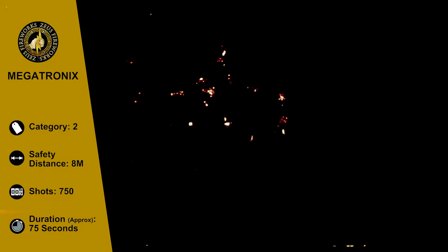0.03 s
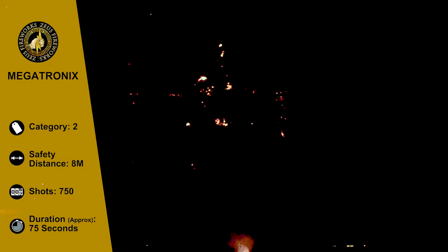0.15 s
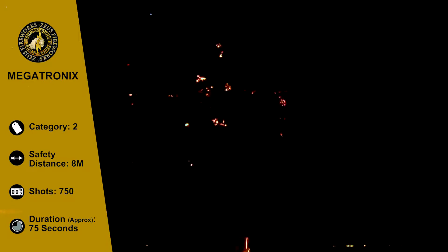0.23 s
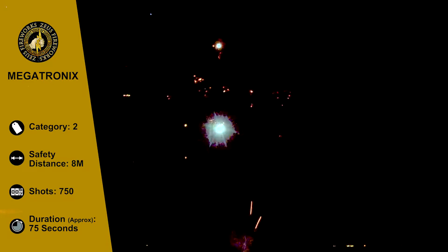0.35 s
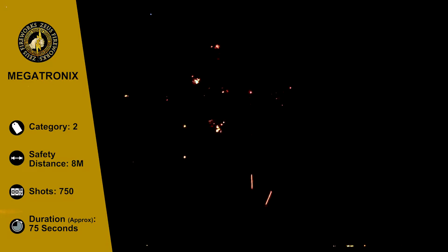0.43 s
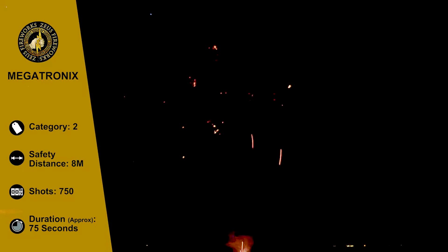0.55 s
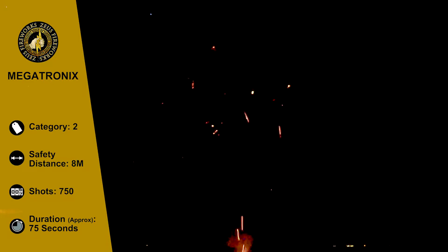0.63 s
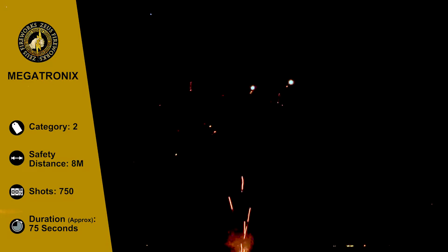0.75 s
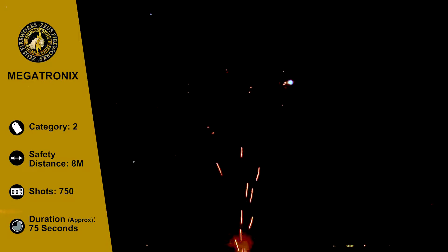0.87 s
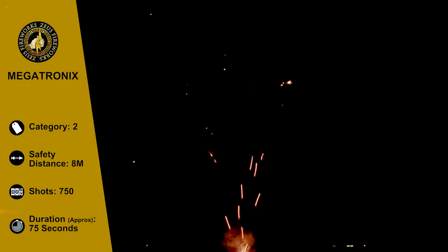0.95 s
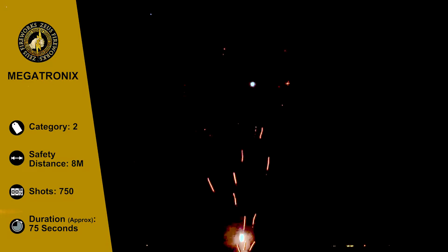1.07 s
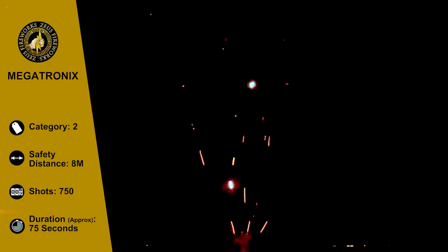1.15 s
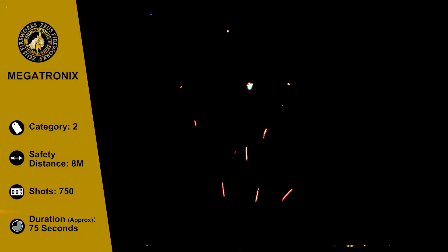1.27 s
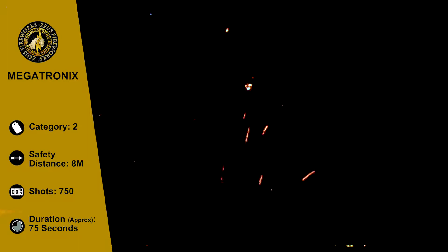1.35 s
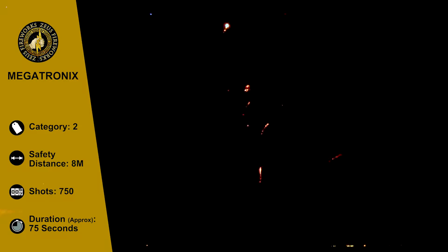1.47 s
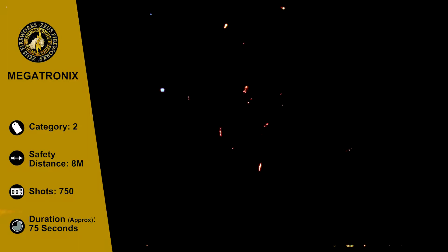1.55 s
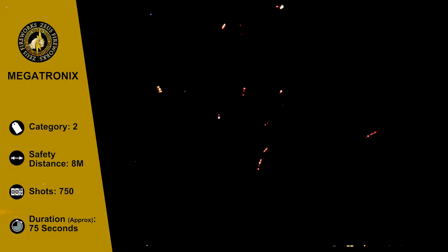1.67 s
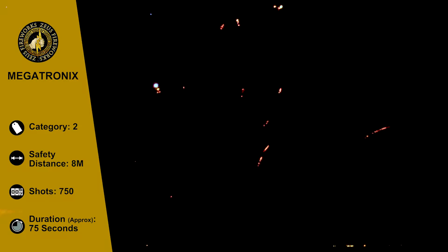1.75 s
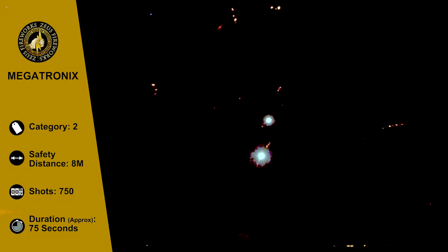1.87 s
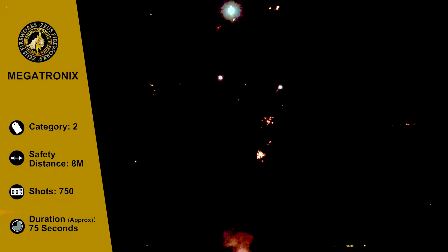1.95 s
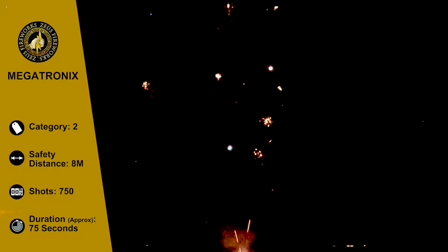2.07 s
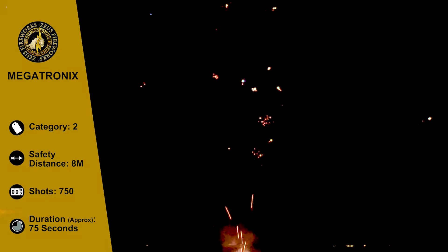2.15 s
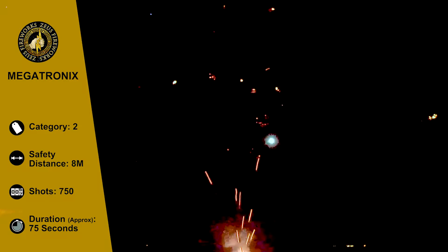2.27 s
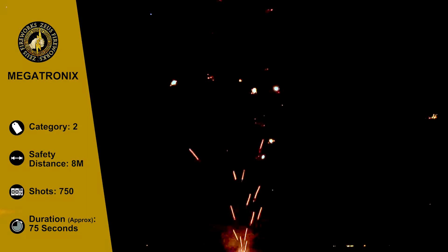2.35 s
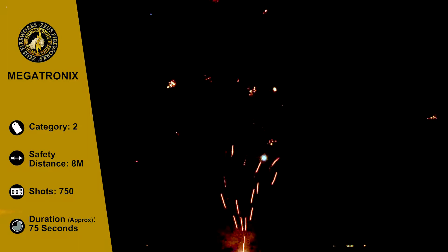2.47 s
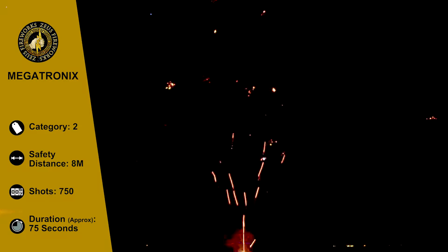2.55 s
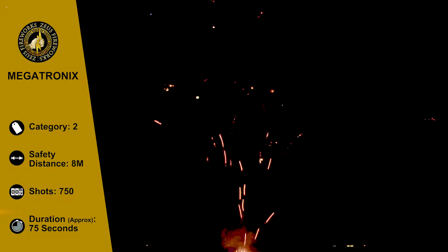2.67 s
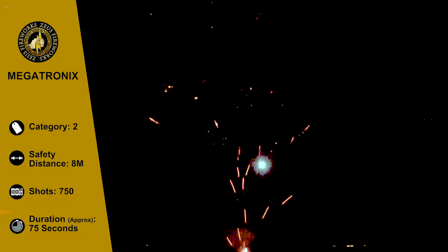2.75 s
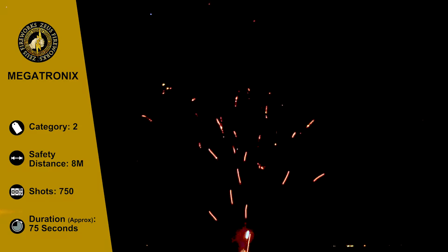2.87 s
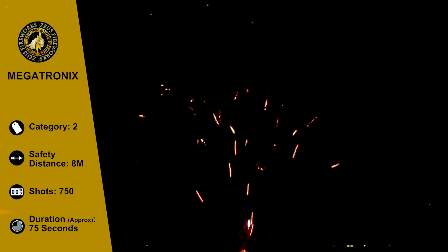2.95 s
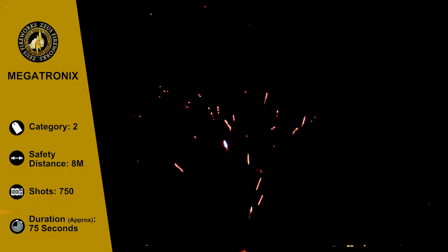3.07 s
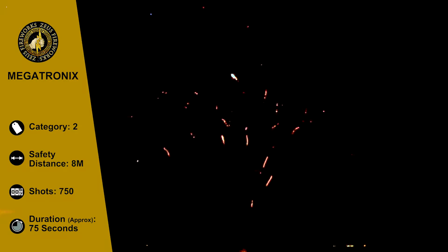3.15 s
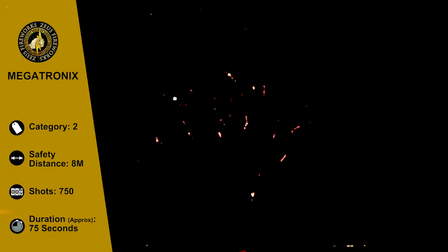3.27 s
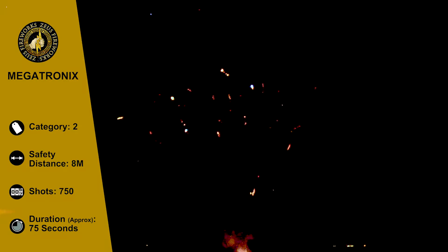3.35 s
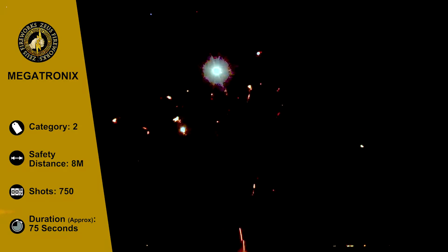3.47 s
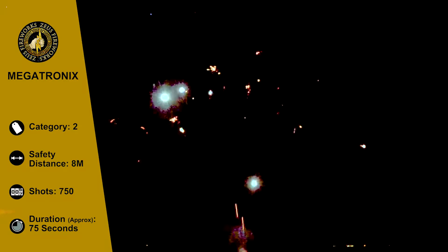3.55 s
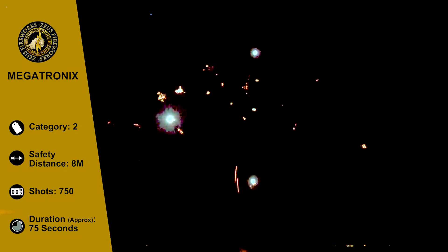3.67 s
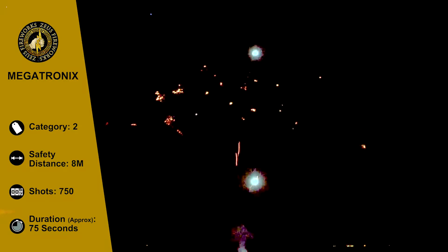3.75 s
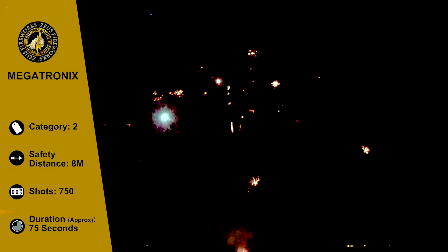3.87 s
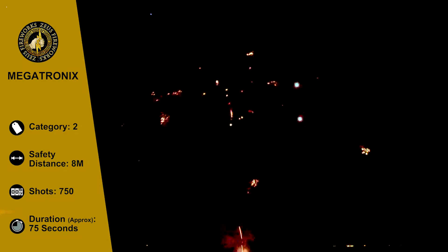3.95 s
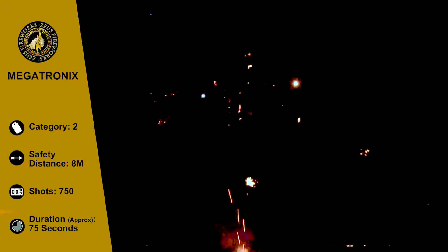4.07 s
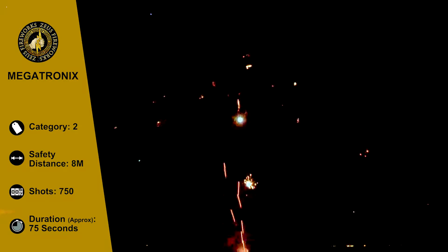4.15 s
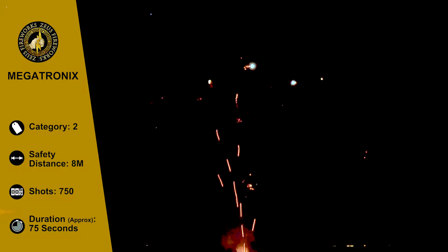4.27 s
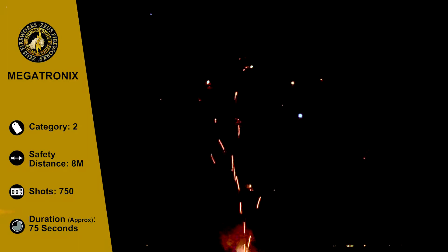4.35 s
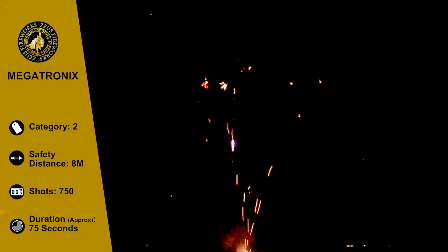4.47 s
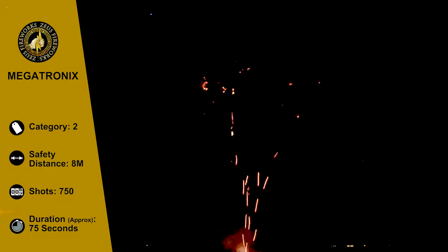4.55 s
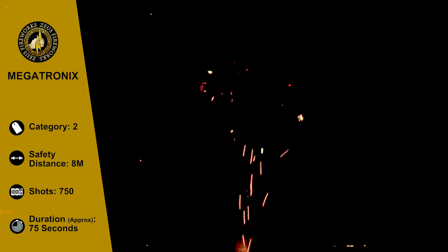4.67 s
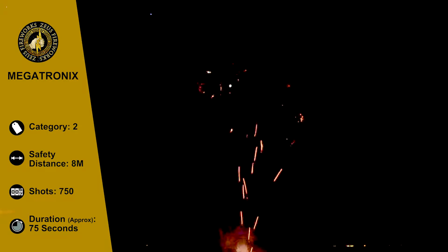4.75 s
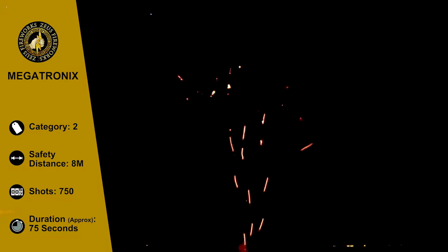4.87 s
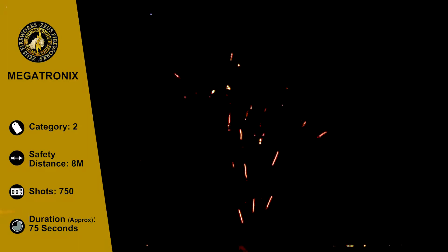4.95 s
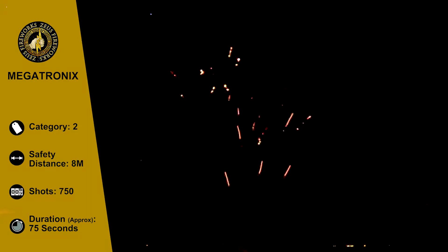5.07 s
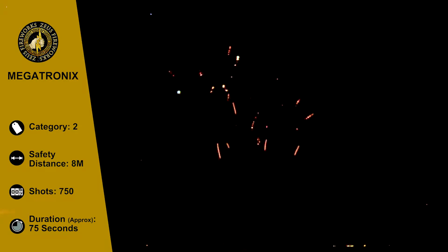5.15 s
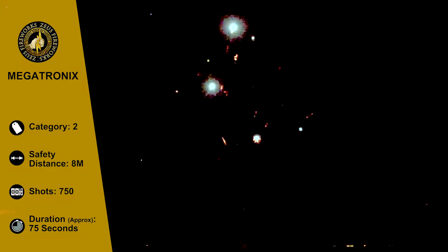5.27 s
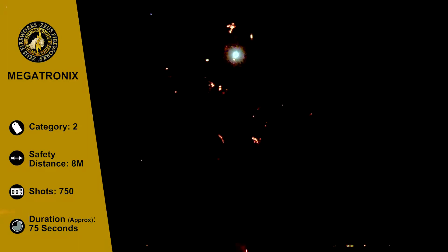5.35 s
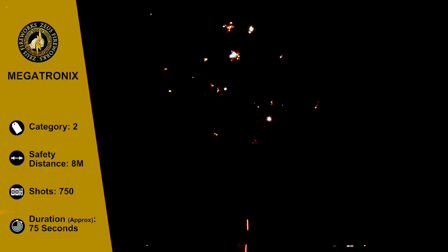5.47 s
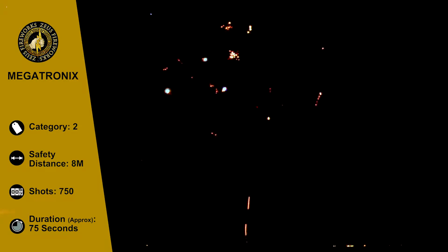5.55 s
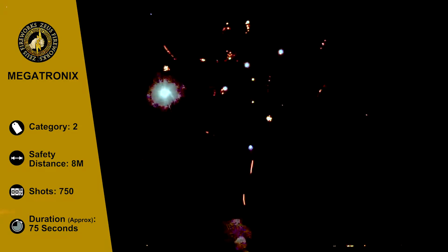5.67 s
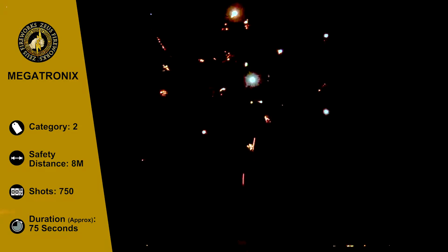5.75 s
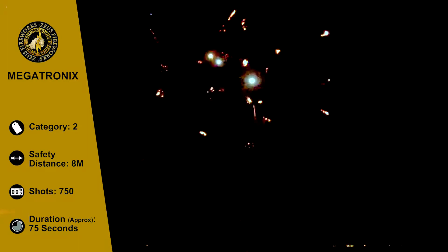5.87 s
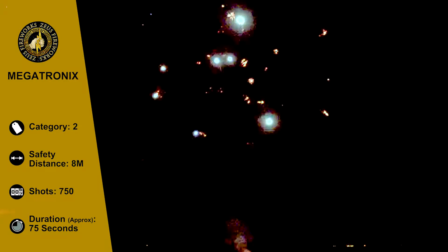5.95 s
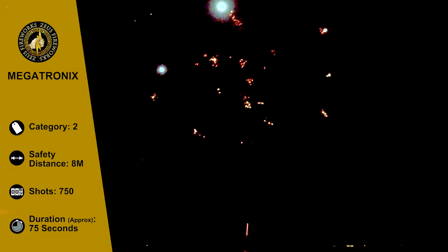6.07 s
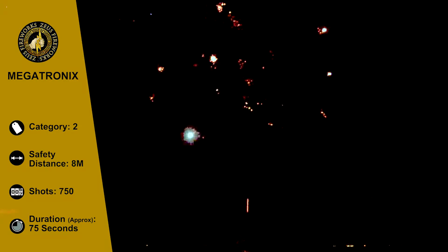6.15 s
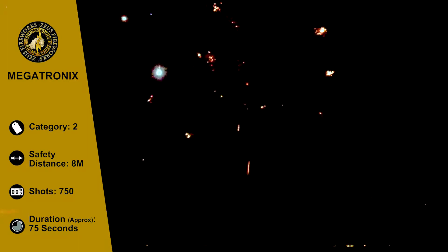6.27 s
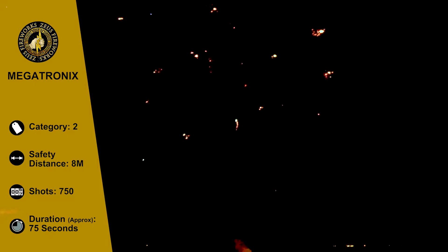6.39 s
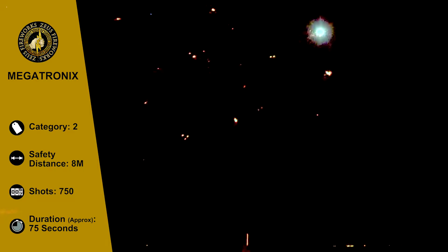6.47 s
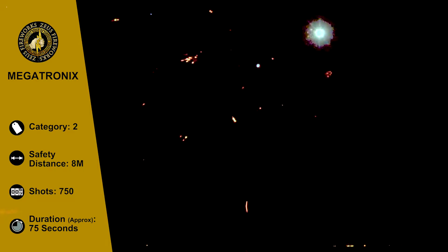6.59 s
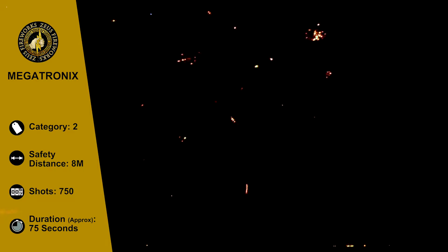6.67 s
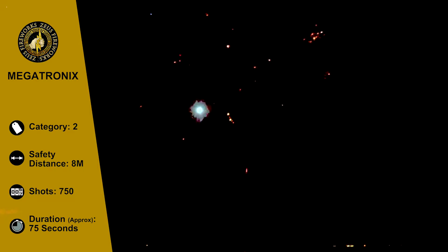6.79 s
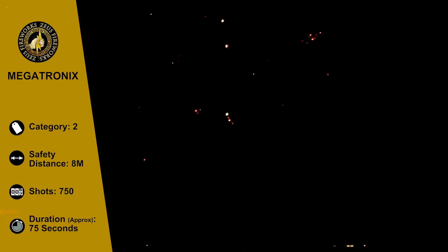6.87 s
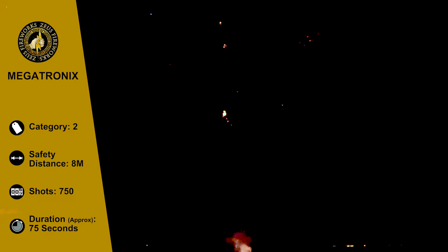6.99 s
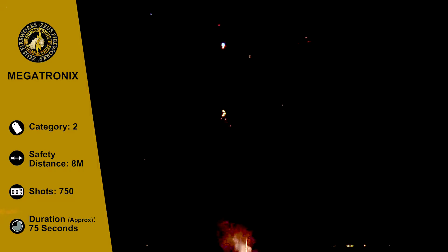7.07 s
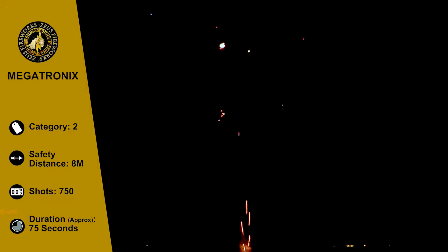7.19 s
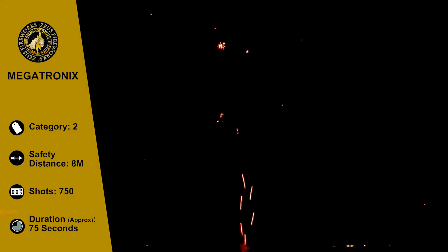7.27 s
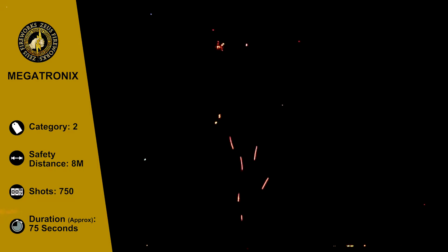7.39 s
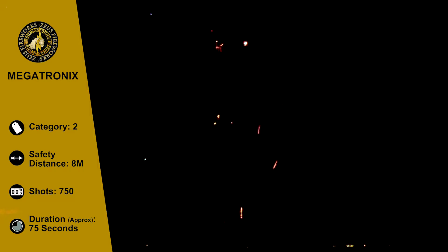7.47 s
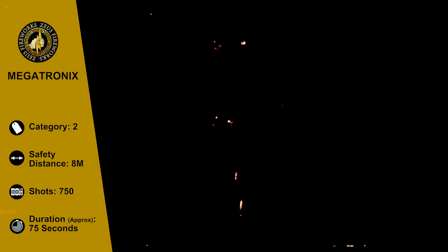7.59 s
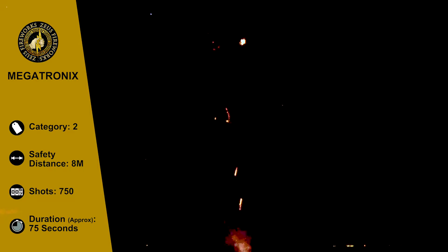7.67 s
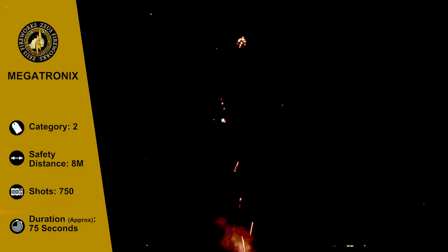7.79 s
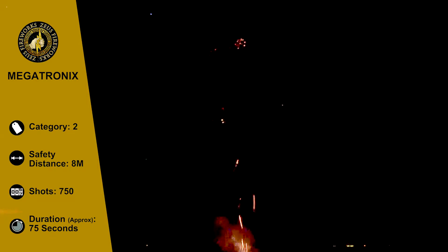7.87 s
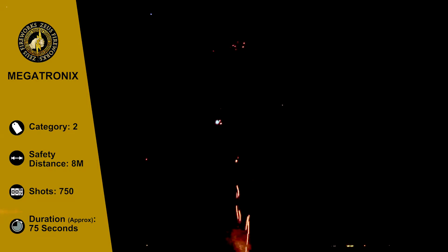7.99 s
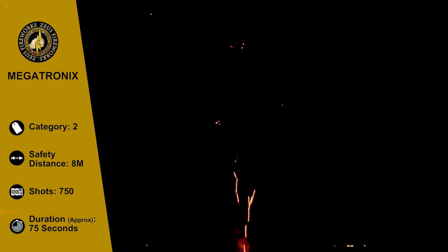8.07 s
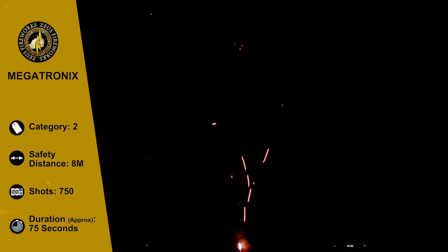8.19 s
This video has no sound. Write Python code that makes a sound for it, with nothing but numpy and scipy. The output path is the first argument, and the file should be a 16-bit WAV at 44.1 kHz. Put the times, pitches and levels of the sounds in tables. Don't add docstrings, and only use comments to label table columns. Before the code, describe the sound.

A fireworks cake fires rapid volleys of shrill, wavering whistling rockets with soft tube thumps, hiss and sharp overhead cracks in an open night field.

```python
import sys
import numpy as np
from scipy import signal
from scipy.fft import rfft, irfft, next_fast_len
from scipy.io import wavfile
from scipy.ndimage import uniform_filter1d

SR = 44100
rng = np.random.default_rng(int(sys.argv[2]) if len(sys.argv) > 2 else 0)


def master_out(mix):
    frames = np.transpose(np.atleast_2d(mix))
    ceiling = np.clip(frames, -1, 1)
    pcm = np.round(ceiling * 32767).astype(np.int16)
    wavfile.write(sys.argv[1], SR, pcm)


def ratio(d):
    e = np.asarray(d, float) / 20
    return 10 ** e


N = 362943

# start_s, thump_peak_db, chirp_db
MAIN_LAUNCHES = [(0.33, -28, -8.5), (0.371, -20, -12.5), (0.687, -14.5, -12), (0.726, -13, -30),
                 (0.762, -18.5, -18), (0.789, -19, -13), (0.835, -14, -13), (0.868, -15.5, -7),
                 (0.905, -19, -13), (0.95, -14, -28), (0.997, -15, -13), (1.051, -24, -14),
                 (1.1, -24, -19), (1.123, -16, -10), (1.171, -16, -10), (2.117, -23, -8.5),
                 (2.155, -15.5, -18), (2.198, -22, -15), (2.243, -24, -39), (2.295, -22, -9),
                 (2.326, -19, -11), (2.349, -15, -8.5), (2.367, -29, -11), (2.393, -15.5, -11.5),
                 (2.483, -24, -10), (2.518, -19, -16), (2.596, -18.5, -12), (2.647, -16.5, -10),
                   (2.719, -33, -10.5), (2.781, -24, -14), (2.824, -23.5, -12), (2.862, -24, -34),
                   (2.888, -18, -12), (2.985, -25, -12.5), (3.558, -22, -11.5), (3.587, -18, -13),
                   (4.02, -22, -11.5), (4.086, -15.5, -12), (4.158, -21, -10), (4.207, -19, -13),
                   (4.244, -17, -12.5), (4.296, -14.5, -14), (4.332, -21, -19), (4.394, -16, -7.5),
                   (4.43, -18.5, -32), (4.451, -16.5, -16), (4.485, -19.5, -18), (4.532, -21, -9),
                 (4.584, -20, -12.5), (4.607, -16, -21), (4.697, -22.5, -28), (4.756, -27, -14),
                 (4.781, -24, -34), (4.815, -25, -12), (4.907, -23, -16), (5.504, -38, -10),
                 (5.59, -20, -18), (6.114, -17.5, -10), (6.56, -16.5, -9), (7.18, -15, -7),
                 (7.219, -13, -12), (7.246, -16.5, -15), (7.274, -15, -31), (7.32, -14.5, -17),
                 (7.346, -14.5, -23), (7.863, -14, -12.5), (7.915, -14.5, -11), (7.958, -32, -17),
                 (7.987, -16.5, -32), (8.042, -13, -13), (8.124, -24, -14), (8.195, -21.5, -10)]
# start_s, thump_peak_db, chirp_db
MORE_LAUNCHES = [(1.021, -19.5, -25), (2.425, -18, -10.5), (2.443, -25, -9), (2.461, -24, -19),
                 (2.563, -24, -8), (2.62, -23, -10.5), (2.672, -23, -8.5), (2.754, -27, -11),
                 (2.94, -28, -9.5), (4.124, -25, -17), (4.27, -25, -25), (4.558, -23, -18),
                 (4.635, -21, -7.5), (4.666, -23, -10), (4.86, -26, -11), (4.945, -29, -8.5),
                 (7.894, -15, -10.5), (8.081, -33, -26), (8.159, -42, -11)]
FIRINGS = MAIN_LAUNCHES + MORE_LAUNCHES


def in_time(rows, off):
    s, *columns = np.transpose(rows)
    return [np.interp(np.arange(N) / SR, s, c, off, off) for c in columns]


def coloured(spectrum):
    size = next_fast_len(N)
    hz, db = np.transpose(spectrum)
    bin_hz = np.arange(size // 2 + 1) * SR / size
    gain = ratio(np.interp(np.log(bin_hz + 1), np.log(hz), db))
    x = irfft(rfft(rng.standard_normal(size)) * gain, size)[:N]
    return x / np.std(x)


def flutter(size, rate_hz):
    knots = rng.standard_normal(300)
    return np.interp(np.arange(size) / SR * 2 * rate_hz, np.arange(len(knots)), knots)


def dull(x, hz):
    return signal.lfilter(*signal.butter(2, min(hz, 20000), fs=SR), x + 1e-18)


def high_pass(x, order, hz):
    return signal.sosfilt(signal.butter(order, hz, "high", fs=SR, output="sos"), x)


def burnout(t, hz, gain, jump_hz=330, last_db=-13.0, last_s=.018):
    left_s = t[-1] - t
    flick = np.clip((last_s - left_s) / .003, 0, 1)
    jump_hz = jump_hz * (1 + 0.27 * np.tanh(rng.standard_normal()))
    return hz + jump_hz * flick, gain * ratio(last_db * flick) * np.clip(left_s / .01, 0, 1)


def add_whistle(tone, power, start_s, hz, gain, jitter_hz, facing_db=4.0, halves_db=0):
    # multiple, level_db
    partials = [(.5, -35), (1.5, -26), (2.0, -21), (2.5, -28.5), (3.0, -26), (3.5, -29), (4.0, -37),
                (4.5, -50.5), (5.0, -45), (5.5, -65), (6.0, -59)]
    length = len(hz)
    i = round(start_s * SR)
    size = min(length, N - i)
    phase = np.cumsum(hz + jitter_hz * flutter(length, 170)) * 2 * np.pi / SR
    wave = np.sin(phase)
    drive = np.clip(np.arange(length)[::-1] / SR / .025, .2, 1)
    rear_db = 3.5 * np.linspace(-1, 1, length)
    for multiple, db in partials:
        partial_db = db + halves_db * (multiple % 1 > 0) + rear_db * (multiple >= 3)
        partial_db = partial_db + facing_db * flutter(length, 14.28)
        wave += drive * ratio(partial_db) * np.sin(multiple * phase + multiple ** 2)
    wave *= np.sqrt(2) * gain * ratio(1.7 * flutter(length, 120))
    tone[i:i + size] += wave[:size]
    power[i:i + size] += gain[:size] ** 2


def solos(turn_s=0.032, swing_hz=65, swing_s=.03, wander_hz=20, climb_hz=149.3, climb_s=0.02984):
    # start_s, burnout_s, top_hz, last_hz, rms_db
    rockets = [(-.35, 0.092, 2623, 2240, -18), (-.22, 0.214, 2532, 2497, -16.5),
               (0.371, 0.799, 2700, 2690, -16), (0.412, 0.732, 2645, 2503, -17),
               (1.197, 1.621, 2500, 2270, -19.5), (1.16, 1.553, 2468, 2630, -21.5),
               (1.204, 1.638, 2685, 2414, -20), (3.147, 3.589, 2438, 2210, -19),
               (3.02, 3.461, 2520, 2418, -20), (3.6, 4.04, 2880, 2468, -15.5),
               (3.63, 4.047, 2637, 2300, -16.5), (4.069, 4.49, 2689, 2620, -15),
               (4.95, 5.432, 2478, 2570, -25), (4.952, 5.411, 2430, 2368, -23),
               (5.552, 6.014, 2540, 2500, -16.5), (5.628, 6.124, 2600, 2220, -16),
               (6.165, 6.548, 2637, 2360, -14.5), (6.596, 6.976, 2580, 2361, -15.5),
               (7.223, 7.702, 2690, 2318, -22), (7.894, 8.37, 2598, 2570, -24)]
    # turn_s, ..
    nozzle_turns = [
        [-.1],
        [.032, .056, .078, .175],
        [.52, .595, .675],
        [.435, .56, .69],
        [1.36, 1.47, 1.55],
        [1.42],
        [1.36, 1.535, 1.6],
        [3.42, 3.5, 3.565],
        [3.25, 3.36],
        [3.675, 3.72, 3.82, 3.9, 3.945],
        [3.68, 3.765, 3.865, 3.945, 4.018],
        [4.11, 4.145, 4.21, 4.26],
        [5.21, 5.29],
        [5.23, 5.29, 5.35],
        [5.655, 5.74, 5.82, 5.955],
        [5.655, 5.735, 5.81, 5.87, 5.94, 6.01, 6.08],
        [6.175, 6.265, 6.282, 6.35, 6.408, 6.462, 6.51],
        [6.62, 6.703, 6.722, 6.785, 6.877],
        [7.36, 7.47, 7.575],
        [7.93, 7.966],
    ]
    # time_s, pitch_hz
    early_paths = [
        [(0, 2370), (.03, 2313), (.055, 2330), (.09, 2140)],
        [(0, 2535), (.02, 2690), (.045, 2450), (.065, 2560), (.085, 2390), (.12, 2554), (.155, 2440),
         (.18, 2440), (.215, 2530)],
        [(.368, 2494), (.395, 2677), (.47, 2677), (.51, 2720), (.545, 2784), (.61, 2660), (.68, 2750),
         (.74, 2656), (.8, 2660)],
        [(.416, 2570), (.45, 2630), (.51, 2580), (.555, 2580), (.58, 2545), (.62, 2524), (.66, 2570),
         (.73, 2530)],
        [(1.2, 2466), (1.3, 2325), (1.38, 2380), (1.46, 2330), (1.49, 2280), (1.535, 2234), (1.56, 2270),
         (1.585, 2265), (1.63, 2246)],
        [(1.16, 2480), (1.3, 2435), (1.38, 2500), (1.46, 2518), (1.5, 2530), (1.54, 2620)],
        [(1.2, 2600), (1.24, 2680), (1.33, 2555), (1.42, 2670), (1.47, 2620), (1.525, 2634), (1.55, 2543),
         (1.585, 2553), (1.62, 2470)],
        [(3.15, 2420), (3.3, 2348), (3.4, 2278), (3.46, 2254), (3.5, 2227), (3.535, 2310), (3.58, 2310)],
        [(3.02, 2550), (3.2, 2490), (3.33, 2446), (3.385, 2375), (3.45, 2484)],
    ]
    # time_s, pitch_hz
    late_paths = [
        [(3.6, 2480), (3.655, 2692), (3.705, 2707), (3.75, 2656), (3.81, 2617), (3.87, 2668), (3.92, 2606),
         (3.97, 2509), (4.04, 2410)],
        [(3.63, 2452), (3.655, 2600), (3.7, 2567), (3.77, 2483), (3.84, 2560), (3.9, 2420), (3.97, 2480),
         (4.0, 2358), (4.04, 2400)],
        [(4.066, 2591), (4.1, 2651), (4.125, 2714), (4.165, 2688), (4.195, 2653), (4.25, 2725), (4.3, 2621),
         (4.49, 2593)],
        [(4.95, 2560), (5.2, 2448), (5.3, 2520), (5.35, 2450), (5.385, 2530), (5.42, 2720)],
        [],
        [(5.55, 2544), (5.585, 2611), (5.77, 2624), (5.81, 2499), (5.84, 2625), (5.88, 2474), (5.945, 2502),
         (5.965, 2570), (6.0, 2470)],
        [(5.685, 2570), (5.72, 2490), (5.785, 2550), (5.85, 2352), (5.89, 2443), (5.93, 2320), (5.96, 2383),
         (6.03, 2240), (6.125, 2357)],
        [(6.17, 2517), (6.205, 2617), (6.344, 2500), (6.37, 2490), (6.4, 2468), (6.415, 2546), (6.5, 2434),
         (6.526, 2560), (6.545, 2430)],
        [(6.61, 2560), (6.708, 2560), (6.782, 2440), (6.798, 2500), (6.82, 2400), (6.85, 2473), (6.885, 2383),
         (6.915, 2444), (6.975, 2362)],
        [],
        [],
    ]
    tone, power = np.zeros(N), np.zeros(N)
    for rocket, turns, path in zip(rockets, nozzle_turns, early_paths + late_paths):
        start, end, top_hz, last_hz, db = rocket
        t = np.arange(max(start, 0), end + .007, 1 / SR)
        age = t - start
        since = t - np.array(turns)[:, None]
        if path:
            hz = np.interp(t, *np.transpose(path)) + 9 * flutter(len(t), 30.0)
        else:
            hz = top_hz + (last_hz - top_hz) * age / (end - start)
            hz += wander_hz * flutter(len(t), 13.0) - climb_hz * np.exp(-age / climb_s)
            swing = np.tanh(since / .006) * np.exp(-np.abs(since) / swing_s)
            hz += swing_hz * np.sum(swing, axis=0)
        facing = ratio(-15) + np.tanh(np.abs(since).min(axis=0) / turn_s)
        gain = np.clip(.25 + age / .08, 0, 1) * ratio(db) * facing
        add_whistle(tone, power, t[0], *burnout(t, hz, gain), 16 + 45 * np.exp(-age / .07))
    return tone, power


def jet_hiss(power):
    # freq_hz, density_db
    jet_spectrum = [(500, -9.5), (1100, -8.5), (2100, 4.5), (3200, 2.5), (5000, 0.5), (8000, -8),
                    (11000, -9.5), (15000, -23)]
    return ratio(-21.5) * np.sqrt(uniform_filter1d(power, size=1000) + 1e-12) * coloured(jet_spectrum)


def low_rumble():
    # freq_hz, density_db
    rumble_spectrum = [(13, -45), (22, -12), (145, 8), (387, -9), (1690, -20), (2040, -11), (2470, 3.5),
                       (3340, -39), (4900, -17), (5610, -21), (15000, -42)]
    # time_s, level_db
    swell = [
        (0.0, -45),
        (3.44, -48),
        (3.64, -39.5),
        (4.1, -38),
        (5.1, -50),
        (6.6, -42),
        (8.23, -46),
    ]
    return ratio(in_time(swell, -48)[0] + 4.5) * coloured(rumble_spectrum)


def cracks(bursts, gain_db=12.5, spray_db=-24.5, boom_db=-30.0):
    # lag_ms, level_db, cutoff_hz
    echoes = [
        (2.4, -13.5, 25000),
        (4.6, -2, 2800),
        (9.3, -41, 11000),
        (15.5, -13.5, 1900),
    ]
    out = np.zeros(N + 2500)
    t = np.arange(2200) / SR
    for (s, db), chance in zip(bursts, rng.standard_normal((len(bursts), 9))):
        u = (t - .0008) / (.00005 * ratio(chance[8]))
        pulse = u * np.exp(-u * u / 2) + .5 * np.clip(u / 2, 0, 1) * np.exp(-np.abs(u) / 3.24)
        pulse -= 0.042 * np.exp(-((u - 16) / 9) ** 2)
        noise = rng.standard_normal((2, len(t))) * (u > 0)
        wave = pulse + ratio(spray_db) * dull(noise[0] * np.exp(-t / 0.019), 7000)
        wave += ratio(boom_db) * dull(noise[1] * np.exp(-t / 0.03), 375) * 4
        for k, (lag_ms, echo_db, hz) in enumerate(echoes):
            lag = round(lag_ms * (1 + 0.11 * chance[k]) * SR / 1000)
            wave[lag:] += ratio(echo_db + 3.0 * chance[4 + k]) * dull(pulse, hz)[:-lag]
        i = round(s * SR)
        out[i:i + len(t)] += ratio(db + gain_db) * wave
    return dull(out[:N], 26000)


def full_cracks():
    # start_s, peak_db
    crack_times = [(0.069, -17.5), (0.123, -15.5), (0.164, -15), (0.313, -31), (0.33, -27), (0.369, -28),
                   (0.431, -13.5), (0.49, -11), (0.585, -16), (0.689, -27), (0.726, -19), (1.345, -23),
                   (1.415, -20), (1.693, -28.5), (1.783, -34), (1.894, -32), (2.047, -28), (2.082, -31),
                   (2.094, -13), (2.175, -12.5), (2.247, -11), (2.277, -20), (2.373, -19), (2.705, -15),
                   (2.728, -20), (2.878, -19.5), (3.304, -10.5), (3.537, -24),
                   (3.647, -14.5), (3.683, -19), (3.723, -25), (3.764, -16.5), (3.855, -20.5),
                     (3.892, -19), (3.957, -25), (3.972, -19.5), (3.994, -20), (4.01, -13), (4.119, -14),
                     (4.134, -13), (4.256, -16), (4.256, -15), (4.345, -13), (4.652, -18), (4.924, -19.5),
                     (5.239, -18), (5.405, -18.5), (5.438, -21.5), (5.464, -30), (5.496, -19), (5.513, -16),
                     (5.593, -15.5), (5.656, -21), (5.669, -18.5), (5.723, -26), (5.774, -24), (5.813, -21),
                     (5.845, -16.5),
                   (5.891, -21), (5.927, -14.5), (5.975, -21.5), (6.011, -12.5), (6.036, -13.5),
                   (6.087, -21.5), (6.112, -21), (6.128, -15.5), (6.163, -15.5), (6.207, -16.5),
                   (6.243, -11), (6.317, -23), (6.35, -15.5), (6.387, -16.5), (6.44, -16), (6.502, -22.5),
                   (6.586, -13), (6.662, -13.5), (6.714, -12.5), (6.781, -12.5), (7.049, -19),
                   (7.162, -29.5), (7.283, -18), (7.676, -28), (7.759, -29), (7.866, -24), (7.916, -33),
                   (7.941, -18), (7.956, -12.5)]
    return cracks(crack_times)


def thin_snaps():
    # start_s, peak_db
    snaps = [(0.089, -28), (0.202, -33), (0.229, -36), (0.558, -28), (3.487, -26), (5.692, -30),
             (5.7612, -28.5), (6.05, -27), (6.1573, -15), (6.4516, -23.5), (6.562, -38), (7.248, -24),
             (0.1458, -26), (0.2614, -42), (0.2908, -35), (0.385, -25), (0.406, -29), (0.5913, -15.5),
             (1.2669, -42), (1.9061, -38.5), (2.0655, -30), (2.1035, -27), (2.2413, -28), (2.5273, -19),
             (3.7888, -22), (4.0272, -22.5), (4.3142, -21.5), (1.232, -30), (5.937, -25), (6.0184, -35),
             (6.0634, -18.5), (6.1945, -29), (6.2734, -26), (7.8215, -42), (7.881, -26)]
    return high_pass(cracks(snaps, gain_db=18.5), 2, 1300)


def sharp_edges():
    # start_s, peak_db
    steps = [
        (0.1654, -21),
        (1.8931, -37),
        (2.048, -29),
        (2.093, -27),
        (2.174, -23),
        (5.4051, -32),
        (5.4949, -41),
        (7.058, -38),
        (7.863, -42),
        (7.955, -20),
    ]
    s, db = np.transpose(steps)
    clicks = np.zeros(N)
    clicks[(s * SR).astype(int) + 40] = ratio(db + 14.0)
    return high_pass(clicks + 1e-18, 2, 9000)


def thumps(tube_hz=(165, 290, 370, 455), t60_s=0.032, puff_db=10.0, lag_s=.004):
    s, db, *_ = np.transpose(FIRINGS)
    clicks = np.zeros(N)
    clicks[((s + lag_s) * SR).astype(int)] = ratio(db - 10.0)
    ring, r = 0, ratio(-60 / (t60_s * SR))
    for w in 2 * np.pi * np.array(tube_hz) / SR:
        ring = ring + signal.lfilter([0, np.sin(w)], [1, -2 * r * np.cos(w), r * r], clicks + 1e-18)
    puff_env = signal.lfilter([1], [1, -ratio(-60 / (.06 * SR))], clicks + 1e-18)
    puff = puff_env * dull(rng.standard_normal(N), 1500)
    return dull(dull(ring + ratio(puff_db) * puff, 676), 676) + ratio(6.0) * puff


def ignitions(delay_s=0.0155, top_hz=3150, low_hz=2450, dive_s=0.005):
    tone, power = np.zeros(N), np.zeros(N)
    t = np.arange(round(.03 * SR)) / SR
    lucks = np.tanh(rng.standard_normal((len(FIRINGS), 3)))
    for (s, _, db), luck in zip(FIRINGS, lucks):
        dive = np.exp(-t / dive_s / ratio(2.55 * luck[1]))
        hz = low_hz + 70 * luck[0] + (top_hz - low_hz) * dive
        stumble_s = .016 + .005 * luck[2]
        swell_s = [0, .004, .009, stumble_s, stumble_s + .002, .025, .03]
        swell_db = np.interp(t, swell_s, [-17, -5, 0, 0, -7, -9, -24])
        add_whistle(tone, power, s + delay_s, hz, ratio(db + swell_db), 85, halves_db=-12)
    return tone, power


def volleys(sag_hz=290, spin_hz=11, wobble_hz=30, beam_db=3.5):
    # time_s, rms_db, fresh_top_hz
    dense = [
        [(0.7, -7, 2673), (1.45, -14.5, 2657), (1.47, -17, 2595)],
        [(2.15, -10.5, 2739), (3.226, -13, 2634), (3.35, -31, 2630)],
        [(4.13, -12, 2700), (4.424, -9, 2668), (5.38, -14, 2649)],
        [(7.25, -8, 2660), (7.61, -10, 2620), (7.67, -20.5, 2616)],
        [(7.92, -20, 2650), (7.98, -8.5, 2648), (8.23, -10.5, 2642)],
    ]
    spreads = [95.1, 131.7, 99.94, 45.23, 89.95]
    tone, power = np.zeros(N), np.zeros(N)
    level = sum(ratio(in_time(rows, -200)[0]) for rows in dense)
    knots_s, _, knots_hz = np.transpose(sum(dense, []))
    for (s, *_), chance in zip(FIRINGS, rng.standard_normal((len(FIRINGS), 5))):
        start = s + .035
        if start * SR >= N or level[round(start * SR)] <= 1e-6:
            continue
        t = np.arange(round((.5 + .05 * chance[0]) * SR)) / SR
        spin = 2 * np.pi * spin_hz * (1 + 0.2046 * chance[1]) * t + 3 * chance[2]
        spread_hz = [hz for rows, hz in zip(dense, spreads) if rows[0][0] <= start][-1]
        hz = np.interp(start + t, knots_s, knots_hz) + spread_hz * np.tanh(chance[3])
        hz -= 140 * np.exp(-t / 0.0254)
        hz -= sag_hz * (1 + .4 * np.tanh(chance[4])) * t / t[-1]
        hz = np.maximum(hz, 2260) + wobble_hz * (np.sin(spin) + flutter(len(t), 9.0))
        gain = np.clip(t / 0.035, 0, 1) * ratio(beam_db * np.cos(spin) - 2.3 * t)
        add_whistle(tone, power, start, *burnout(t, hz, gain), 15 + 50 * np.exp(-t / .07))
    even = uniform_filter1d(level, size=600) / np.sqrt(uniform_filter1d(power, size=3000) + 2.1)
    return tone * even, power * even ** 2


def squeals(length_s=0.04, fall_hz=190):
    # start_s, peak_db, pitch_hz
    uneven = [(0.786, -25, 2810), (0.8508, -20, 2900), (1.015, -10, 2850), (1.178, -6, 2860),
              (1.4793, -16, 2890), (2.0934, -43, 2890), (2.1328, -22, 2830), (2.1743, -31, 2760),
              (2.315, -17, 2900), (2.5858, -20, 2850), (2.6287, -14, 2975), (3.38, -33, 2880),
              (3.5732, -21, 2820), (3.605, -27, 2830), (3.9926, -35, 2900), (4.1109, -7.5, 2670),
              (4.171, -11, 2910), (4.2256, -17, 2800), (4.413, -7, 2768), (4.4516, -17, 2860),
              (4.5124, -14, 2827), (4.5566, -14, 2830), (4.5895, -8, 3010), (4.72, -13, 2880),
              (4.8837, -9, 2890), (4.931, -5, 2800), (5.128, -34, 3054), (5.497, -26, 2910),
              (5.6693, -28, 3070), (5.8439, -29, 2980), (6.035, -43, 2870), (6.242, -36, 2930),
              (6.3498, -38, 2820), (6.5443, -26.5, 2840), (6.5738, -31, 2770), (6.7129, -43, 3020),
              (6.781, -38, 3120), (7.194, -29, 2700), (7.2386, -15, 2800), (7.263, -12, 2880),
              (7.3, -5.5, 2870), (7.338, -31, 2800), (7.8644, -41, 2900), (7.911, -20, 2800),
              (7.9596, -14, 3070), (8.042, -7, 2880), (8.0993, -11, 2830), (8.144, -7, 2850)]
    tone, power = np.zeros(N), np.zeros(N)
    t = np.linspace(0, 1, round(length_s * SR))
    fade = np.clip(np.minimum(t / 0.068, (1 - t) / 0.5), 0, 1)
    for s, db, hz in uneven:
        add_whistle(tone, power, s, hz - fall_hz * t ** 2, ratio(db - 10.5) * fade, 50)
    return tone, power


def strays():
    # time_s, whistle_hz, rms_db
    passes = [
        [(3.03, 2650, -22.5), (3.09, 2794, -20), (3.265, 2830, -17.5), (3.308, 2840, -20), (3.328, 2720, -25),
         (3.375, 2540, -15.5), (3.39, 2600, -27)],
        [(5.17, 2576, -37), (5.23, 2630, -22), (5.265, 2700, -16), (5.3, 2690, -27), (5.335, 2456, -44)],
        [(2.87, 2847, -34), (2.93, 4250, -22)],
        [(4.85, 5730, -29), (4.89, 5300, -31)],
        [(5.295, 3150, -29), (5.335, 3167, -30)],
        [(7.476, 3120, -26), (7.5, 3300, -24)],
    ]
    tone, power = np.zeros(N), np.zeros(N)
    for rows in passes:
        s, hz, db = np.transpose(rows)
        t = np.arange(s[0], s[-1], 1 / SR)
        gain = ratio(np.interp(t, s, db))
        add_whistle(tone, power, s[0], *burnout(t, np.interp(t, s, hz), gain), 15)
    return tone, power


def field(x, far_db=-22.0, far_t60_s=2.1):
    t = np.arange(2 * SR) / SR
    near = ratio(-19 - 60 * t / .2) / np.sqrt(.2 * SR / 14)
    far = ratio(far_db - 60 * t / far_t60_s) / np.sqrt(far_t60_s * SR / 14) * np.clip(t / 0.023, 0, 1)
    white = rng.standard_normal((2, len(t)))
    lead_in = x[SR:2 * SR]
    wet = signal.fftconvolve(np.r_[lead_in, x], near * white[0] + far * dull(white[1], 10500))
    return wet[SR:SR + N]


def scene():
    tone, power = np.sum([solos(), ignitions(), volleys(), squeals(), strays()], axis=0)
    blasts = high_pass(thumps() + full_cracks(), 4, 190) + thin_snaps()
    cake = tone + jet_hiss(power) + blasts + sharp_edges()
    return (cake + field(cake) + low_rumble())[None]


def top_cut(x):
    return signal.sosfilt(signal.butter(12, 15710, fs=SR, output="sos"), x)


def record(dry):
    heard = high_pass(dry, 2, 30)
    return top_cut(1.253 * np.tanh(heard / 1.325))


dry = scene()
out = record(dry)
master_out(out)
```